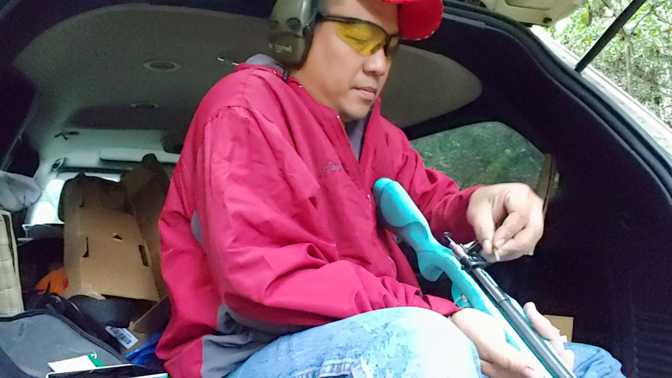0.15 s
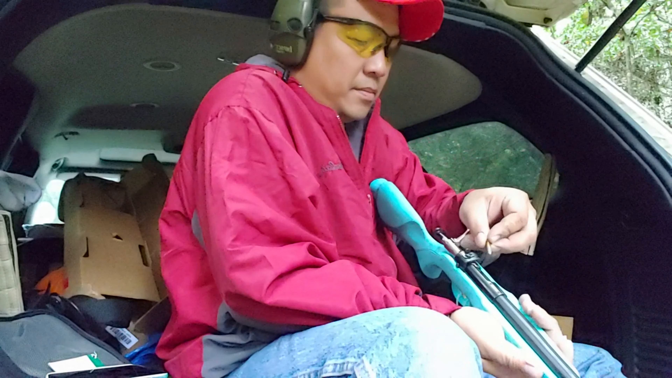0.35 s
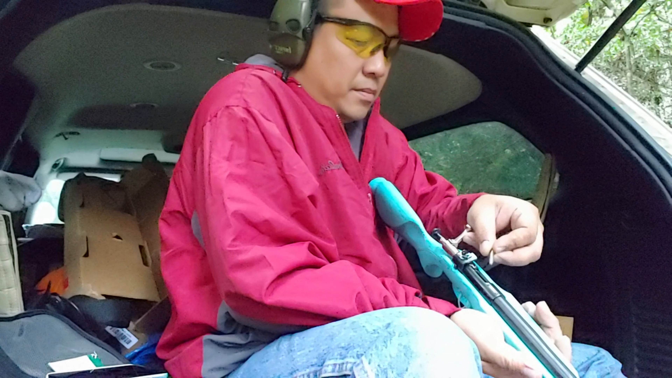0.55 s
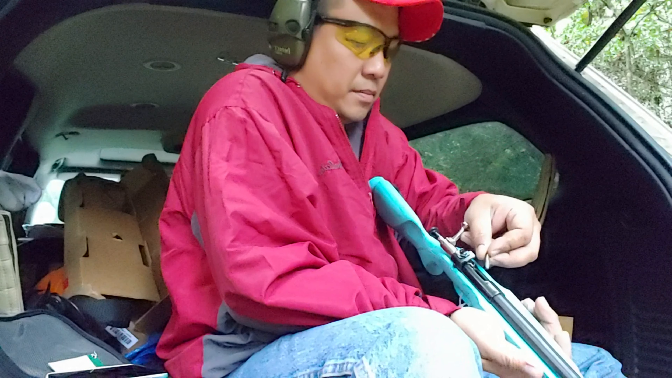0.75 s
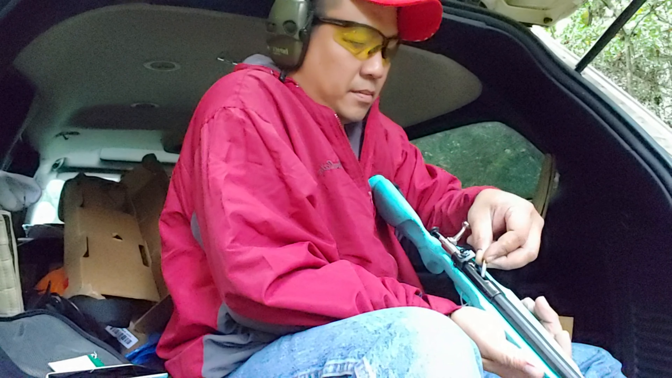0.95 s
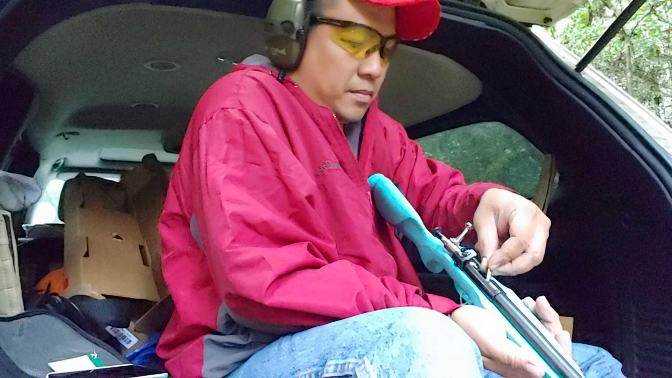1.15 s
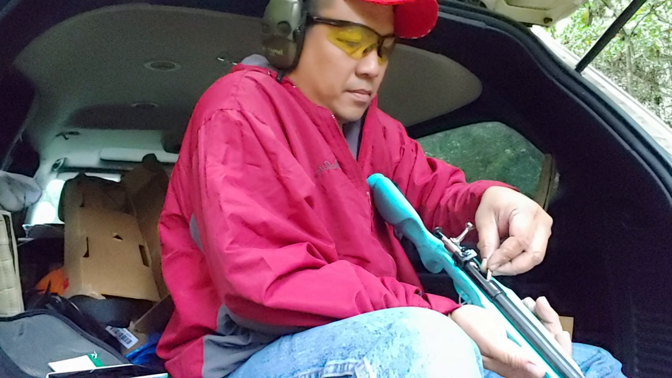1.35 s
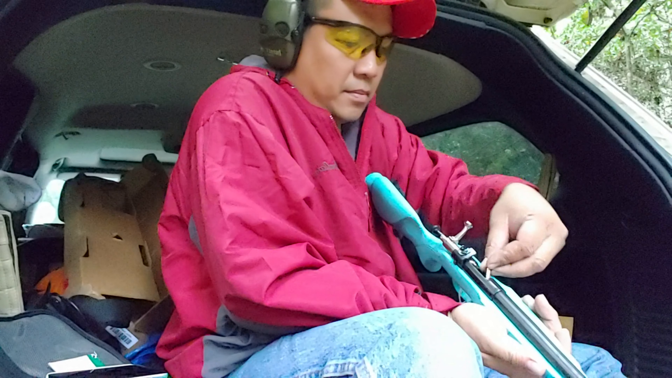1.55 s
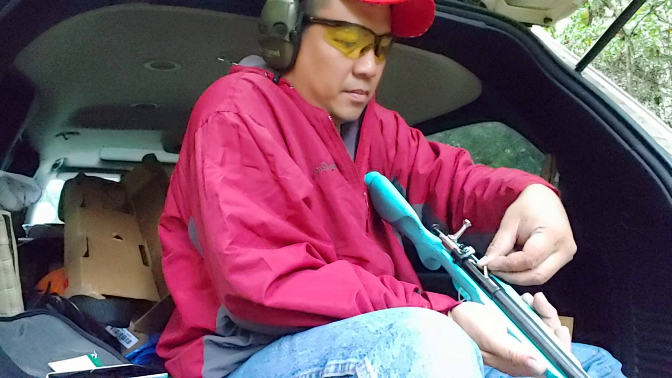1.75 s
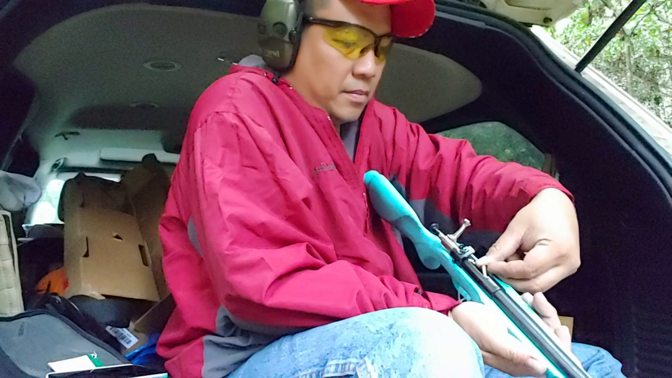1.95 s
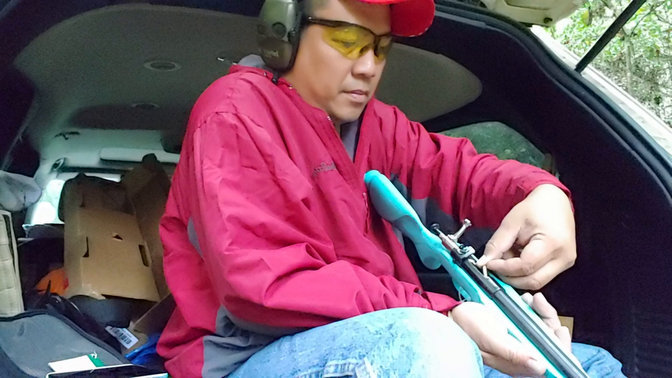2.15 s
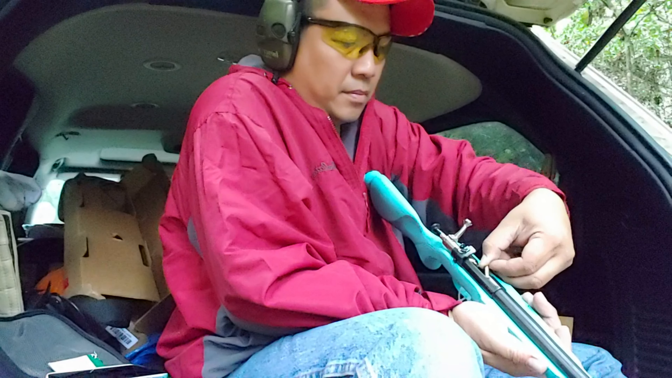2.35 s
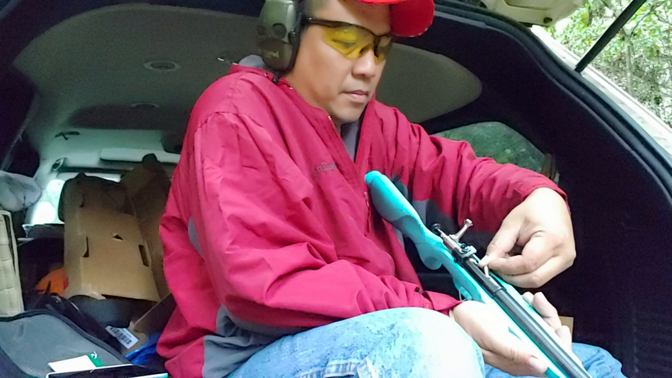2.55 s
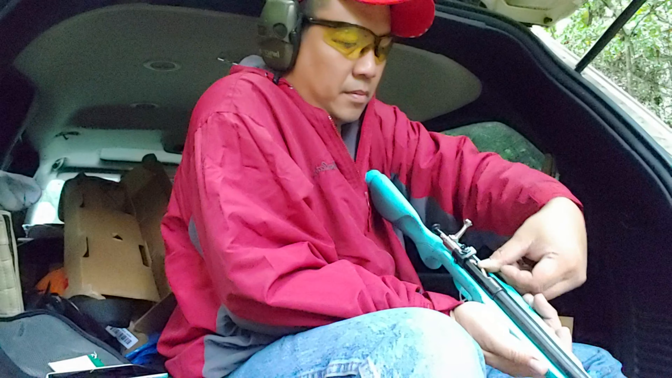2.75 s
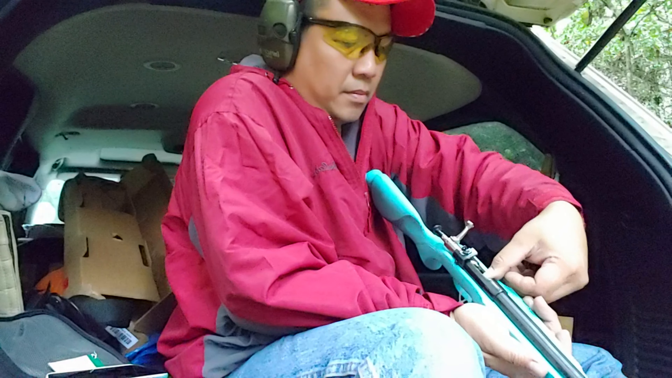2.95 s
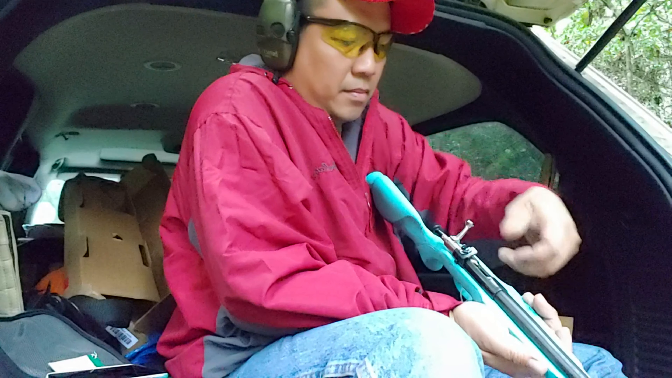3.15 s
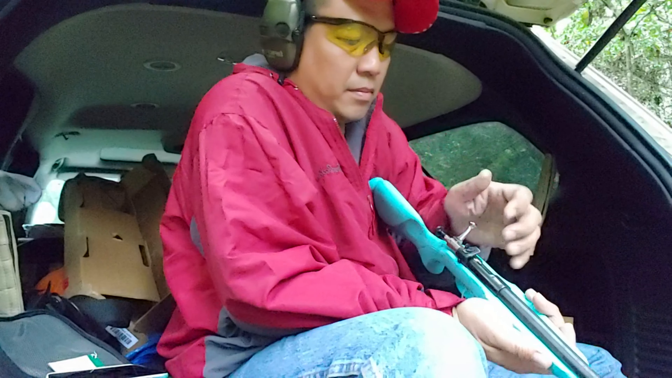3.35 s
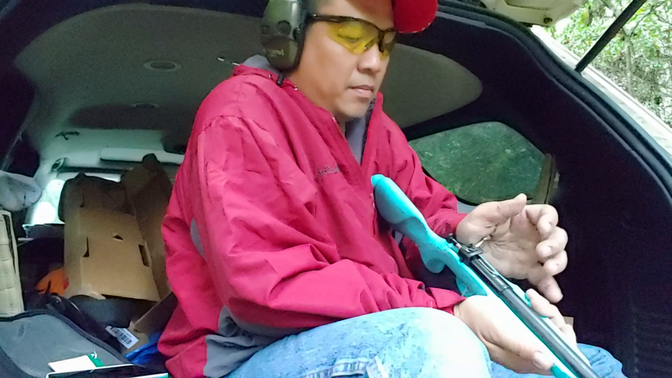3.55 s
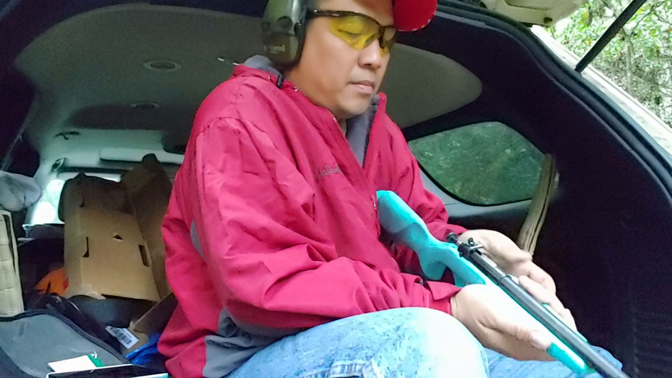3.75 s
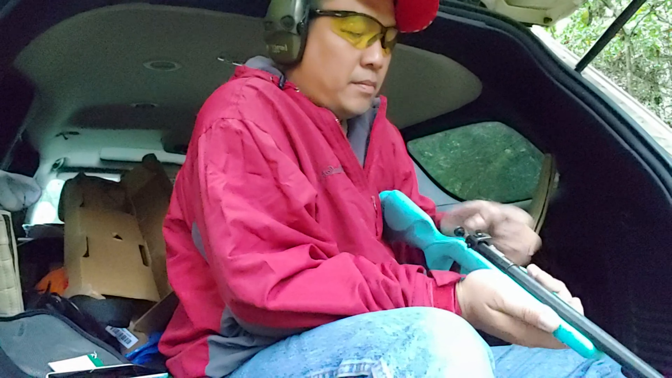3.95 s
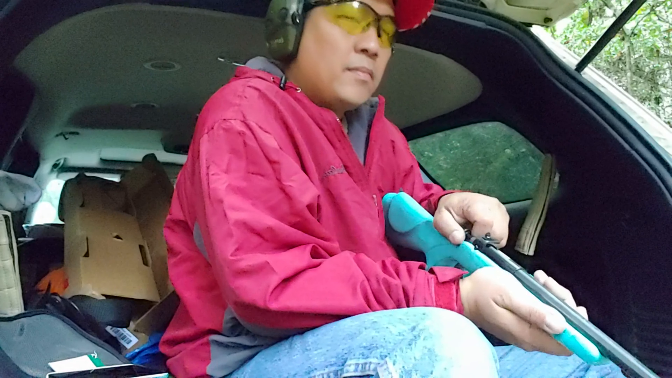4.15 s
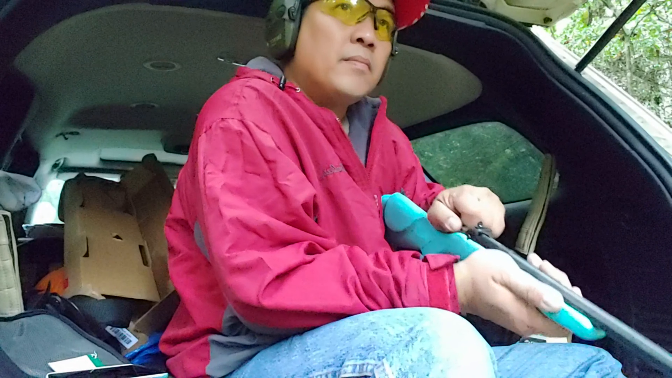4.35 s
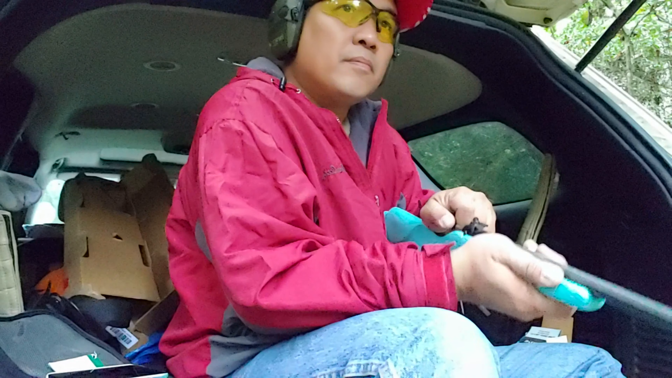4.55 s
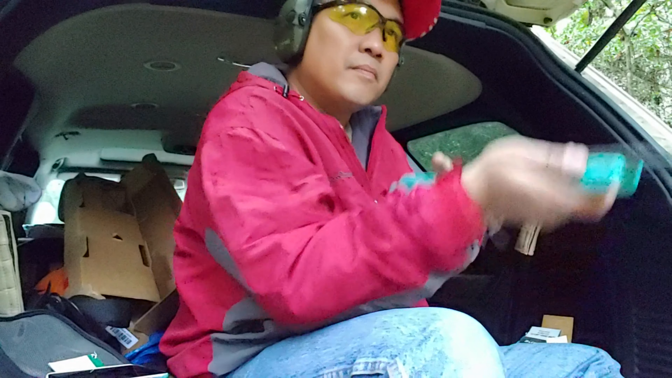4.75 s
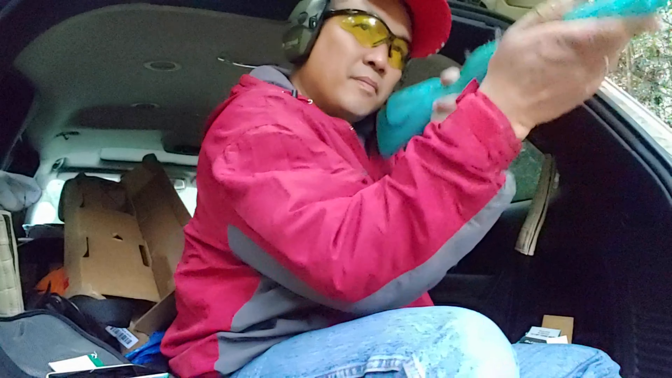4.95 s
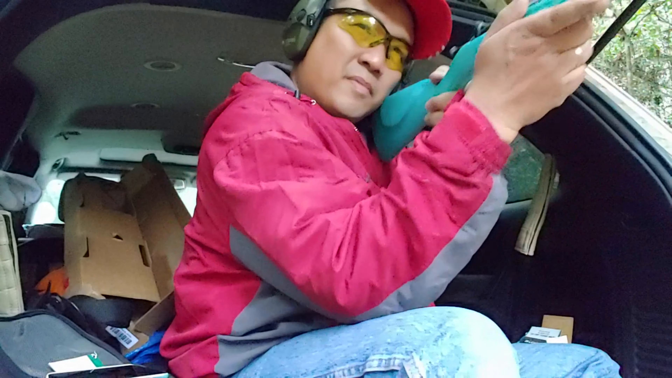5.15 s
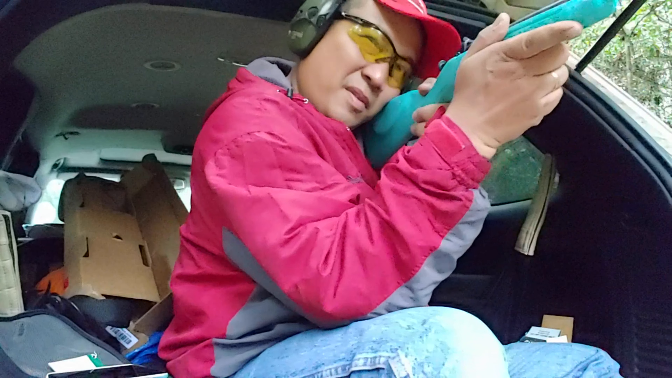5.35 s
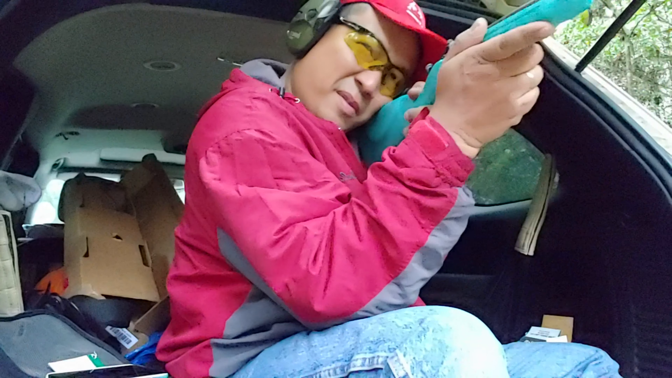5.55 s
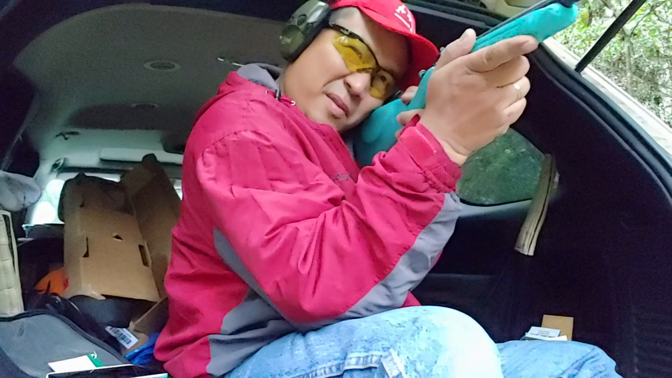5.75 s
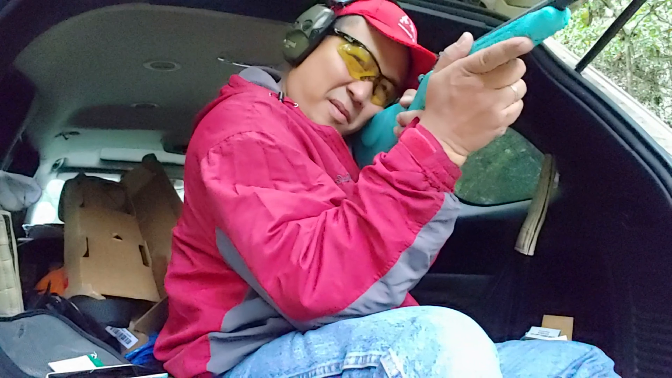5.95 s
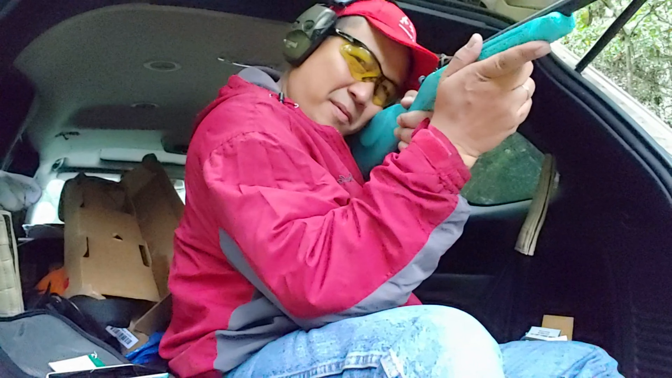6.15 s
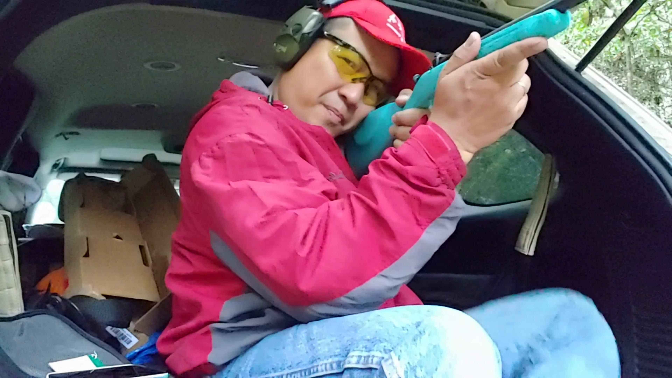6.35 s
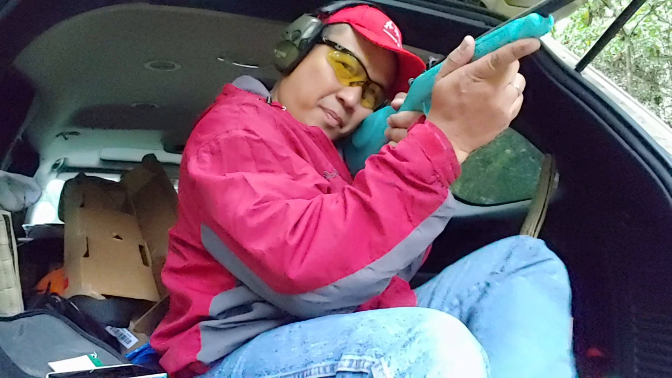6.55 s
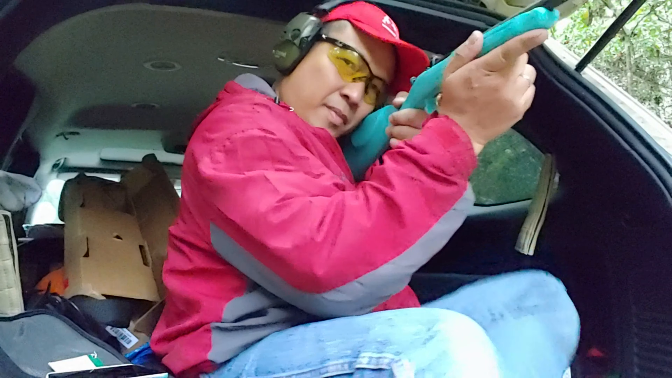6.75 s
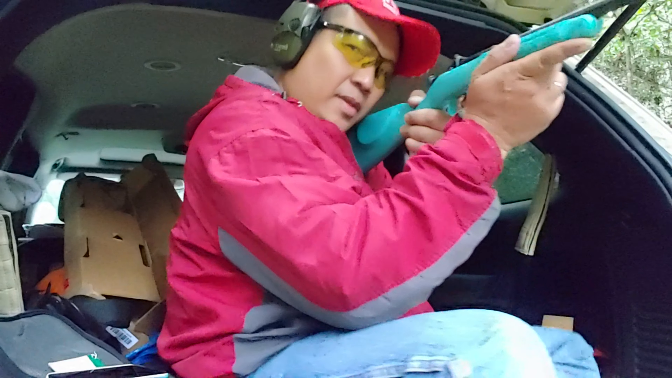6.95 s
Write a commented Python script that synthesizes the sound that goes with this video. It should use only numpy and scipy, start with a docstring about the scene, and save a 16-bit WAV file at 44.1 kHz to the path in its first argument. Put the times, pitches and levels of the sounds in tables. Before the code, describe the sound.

Metallic clicks of a rifle being loaded, a hard bolt clack, then a louder short shot with a dull thump over faint wind.

```python
"""Loading and firing a rifle in a car

A man sits in the open back of a car; a phone's two microphone ports hear him, the left one facing away from the
gun. Cartridge, bolt and grip click as chatter, part pings and steel rings; the bolt scrapes home as rough
noise. A dull thump booms in the panels and the shot's sharp crack follows, both dying fast in the padded cabin.
Noise makes the jacket's rustle, the wind outside and a faint, distant hollow drone."""
import sys
import numpy as np
from scipy import signal
from scipy.fft import rfft, irfft, next_fast_len
from scipy.io import wavfile
from scipy.ndimage import uniform_filter1d

SR = 44100
rng = np.random.default_rng(int(sys.argv[2]) if len(sys.argv) > 2 else 0)


def wav_record(signal):
    """Record a signal, one row per channel, as 16-bit PCM in the file named by sys.argv[1]."""
    frames = np.transpose(np.atleast_2d(signal))
    bounded = np.clip(frames, -1, 1)
    # unit amplitude maps onto the largest positive 16-bit level
    quanta = np.round(bounded * 32767).astype(np.int16)
    wavfile.write(sys.argv[1], SR, quanta)


N = 308501
T = np.arange(N) / SR

# Metal clicks of the cartridge, bolt and grip: start_s, strength_db, hardness_db_per_octave (treble tilt),
# stock_db, contact_decay_ms, ping_hz (part struck), ping_db (over the blow's spectrum)
RIFLE_CLICKS = [ (.4938, -34, -3.5, -7, 4.2, 4180, 14), (0.4977, -38, -6, -5, 3, 1810, 17),
                (.615, -34.5, -8, -3.5, 4.1, 4220, 13), (0.6876, -42, -15, -5.5, 3.4, 1620, 12),
                (1.1368, -50, -14, -2, 3, 3430, 12), (1.2056, -45.5, -13, 0, 4.6, 3430, 8),
                (1.434, -50, 2.5, -7, 3.4, 10900, 12), (2.177, -41.5, -4, -2, 2, 6340, 8),
                (2.371, -37.5, -12, -12, 3.9, 4400, 8), (2.68, -51, -3, 1, 3.7, 1870, 10),
                (2.8238, -48.5, -9, -7, 2, 4000, 6), (2.993, -46.5, -9, -2, 3, 4400, 10),
                (3.04, -39, -12, -3.5, 5, 1860, 12), (3.048, -36.5, -14, -7, 6, 3820, 8),
                (3.08, -56.5, -10, 8, 5.4, 1870, 15), (3.193, -49, -6, -10, 1.7, 8000, 12),
                (3.573, -36, -10, -1.5, 3.9, 1990, 11.5), (3.6134, -27.5, 2, -2.5, 3, 1750, 4),
                (3.6152, -18, 0, -14, 1.7, 5920, 17), (3.6195, -24, -4, 0.5, 3.1, 10450, 11),
                (3.6325, -22, -0.8, -4, 3.5, 4030, 9), (3.781, -37, -5, -5, 2.2, 4020, 12),
                (3.8162, -17.5, -6.3, -5, 1.6, 1760, 15), (4.186, -47.5, -12, -2.5, 3.7, 1740, 8),
                (4.498, -49.5, -10, -8, 7, 3970, 15), (4.5594, -21.5, -4, -3.5, 3.9, 1610, 6),
                (4.564, -19, -3.5, -6, 2.4, 3420, 11), (4.7321, -34, -4.5, -4.5, 4, 3800, 4),
                (5.548, -42, -2.5, -10, 3.4, 6600, 18), (5.732, -46, -1.5, -7, 2, 6530, 19),
                (5.8045, -45.5, -12, -1.5, 3.3, 2090, 9), (6.197, -46.5, -10, -5, 2.2, 2100, 13),
                (6.821, -41, -9, 4, 8.9, 3900, 0)]
# Ringing of the rifle's steel: pitch_hz, level_db, t60_s
STEEL_MODES = [(1302, -10.5, 0.079), (1641, -12.5, 0.081), (1757, -7.5, .065), (1900, -12.5, 0.087),
               (3140, -14, .10), (3760, -25, 0.028), (4220, -6.5, 0.052), (4700, -15, 0.067),
               (5300, -12, 0.086), (5870, -16.5, 0.085), (5880, -20.5, 0.11), (6400, -25, 0.14),
               (6600, -20.5, 0.28), (7070, -22, .12), (10100, -25, .08), (10480, -18, 0.17)]
# Colour that all blows on the rifle share: pitch_hz, level_db
SHARED_BLOW_TONE = [(550, -10.5), (1000, -2.5), (1700, 0), (3800, 0), (6200, 1.5), (10000, -2.5),
                    (12500, -8)]
# Strokes of the bolt in its raceway: stop_s (meets its stop), length_s, final_db
BOLT_STROKES = [(3.619, .028, -31.5), (4.56, 0.026, -38.5)]
# Soft blows on the car body: start_s, level_db, push_ms
BODY_THUMPS = [(6.316, -48, .5), (6.342, -31, 0.5), (6.8150, -19.5, 1.15), (6.821, -5.5, 1.4),
               (6.8460, -24.5, 0.56), (6.856, -9, 7.4), (6.877, -23.5, .3)]
# Resonances of the panels and cabin air: pitch_hz, level_db, t60_s
PANEL_MODES = [(89.6, -22, .08), (171, -26, .06), (262, 2.5, .04), (305.4, -2, 0.079), (492, -10, .04),
               (735, -5.5, 0.031), (1065, -8.5, 0.042)]
# Arm movements that rub the jacket: fastest_s, half_length_s, level_db
JACKET_MOVES = [(0.046, 0.18, -55.5), (3.202, 0.079, -52.5), (4.72, 0.11, -51), (5.037, 0.12, -50),
                (6.782, 0.064, -47.5)]
# Spectrum of the outdoor air: pitch_hz, relative_level_db (per Hz)
AIR_SPECTRUM = [(20, -16.5), (40, -6.5), (70, 1.5), (105, -0.5), (140, -13.5), (175, -13), (230, -19),
                (500, -15.5), (1000, -22.5), (2000, -25), (4000, -29.5), (7000, -33), (10500, -38.5),
                (12500, -43.5)]
# Breeze, a dying gust at first and a fresh one at the end: peak_s, half_length_s, rumble_rise_db, hiss_rise_db
WIND_GUSTS = [(.1, 1, -0.3, 2), (7, 0.41, 4, 5)]
# Bands of the far drone: pitch_hz, width_hz (of one filter pass), level_db
DRONE_PEAKS = [(168.3, 38, -5.5), (324, 46, -9), (505.9, 17.6, 0)]
# Colour of the left microphone port: pitch_hz, level_db
LEFT_PORT_TONE = [(150, 2.5), (400, -3), (1000, 0.5), (1800, -1.5), (2500, -4), (3200, -5), (3900, 0),
                  (4700, 1), (5300, -0.5), (6400, 7), (7100, 0), (7900, -8), (9300, 0), (11200, 0)]
# Colour of the right microphone port: pitch_hz, level_db
RIGHT_PORT_TONE = [(150, 2), (400, 1), (1000, 4.5), (1750, 3.5), (2150, 0.5), (2550, -17), (3100, -1.5),
                   (3650, 7), (4700, -0.5), (6300, -6.5), (7700, 1), (9300, -5), (11200, -6.5)]

# The stock speaks below the first pitch; hardness tilts the treble above the second
STOCK_HZ, STEEL_HZ = 1700, 3720
# Blows weaker than a full one lose bass first
THUD_HZ, THUD_PER_DB, FULL_BLOW_DB = 560, 0.5, -22.5
# The hands damp a ping by 60 dB within this many cycles, so low pings last longer
PING_CYCLES = 58.5


def shot():
    """The striker snaps forward; the crack follows at once and sets the receiver pinging."""
    striker_s, crack_delay_ms = 6.8761, 2.4
    striker = blow(-23.5, hardness=-8, stock_db=-1.5, contact_ms=3.2, ping_hz=3480, ping_db=-3)
    crack = blow(-21.5, hardness=-4, stock_db=0.5, contact_ms=2.3, ping_hz=3600, ping_db=17.5)
    out = np.zeros((2, N))
    add(out, striker_s, striker)
    add(out, striker_s + crack_delay_ms / 1000, crack)
    return out


def rifle():
    """Blows of metal on metal as he loads, locks the bolt and takes aim."""
    out = np.zeros((2, N))
    for start_s, *click in RIFLE_CLICKS:
        add(out, start_s, blow(*click))
    return out


def blow(db, hardness, stock_db, contact_ms, ping_hz, ping_db):
    """One blow on the rifle: contact chatter, a ping of the part struck, ringing steel and cabin reflections."""
    t = np.arange(SR // 5) / SR
    tone = blow_tone(db, hardness, stock_db)
    attack = 1 - np.exp(-(1000 * t / 0.81) ** 2)  # rise in ms
    crack = contact_crack(t, attack, contact_ms)
    cabin = cabin_decay(t)
    # chatter and each port's reflections have noise of their own
    bursts = np.array([crack, cabin, cabin]) * rng.standard_normal((3, len(t)))
    chatter, *echoes = colour(bursts, tone, size=512)
    ping_fade = fade(t, PING_CYCLES / ping_hz)
    ping = undb(ping_db + db_at(ping_hz, tone)) * ping_fade * np.sin(2 * np.pi * ping_hz * t)
    direct = chatter + attack * (ping + steel_ring(t, tone))
    return np.array([far_port(direct), direct]) + echoes


def blow_tone(db, hardness, stock_db):
    """Spectrum of a blow: hard contacts are bright, the stock adds body, and only strong blows thud."""
    hz, shared = np.transpose(SHARED_BLOW_TONE)
    treble = hardness * np.maximum(np.log2(hz / STEEL_HZ), 0)
    body = db_at(hz, [(STOCK_HZ, stock_db), (STEEL_HZ, 0)])
    thud_db = THUD_PER_DB * (db - FULL_BLOW_DB)
    thud = db_at(hz, [(THUD_HZ, thud_db), (2 * THUD_HZ, 0)])
    return np.column_stack([hz, db + shared + treble + body + thud])


def contact_crack(t, attack, contact_ms):
    """Envelope of steel chattering on steel in a quick run of uneven micro-contacts."""
    hold = 20  # samples per micro-contact
    strengths = np.repeat(rng.standard_normal(len(t) // hold + 1), hold)[:len(t)]
    contacts = unit(undb(4 * strengths))  # spread 4 dB
    return undb(15.5) * attack * contacts * np.exp(-1000 * t / contact_ms)


def cabin_decay(t):
    """Envelope of the padded cabin's reflections: a strong short tail over a weak longer one."""
    build = 1 - np.exp(-1000 * t / 0.55)  # in ms
    early = undb(8.5) * fade(t, 0.058)
    late = undb(-13) * fade(t, 0.35)
    return build * (early + late)


def steel_ring(t, tone):
    """Decaying modes of the steel, each as strong as the blow's spectrum at its pitch, give or take."""
    rings = modes(t, STEEL_MODES)
    mode_hz = np.array(STEEL_MODES)[:, 0]
    chance_db = 2 * rng.standard_normal(len(STEEL_MODES))
    return undb(3.7 + db_at(mode_hz, tone) + chance_db) @ rings


def far_port(direct):
    """The left port faces away from the gun: later, and shaded in the middle range and treble."""
    later = np.pad(direct, (SR // 5500, 0))[:len(direct)]  # about 0.18 ms
    shade = [(400, -2.5), (1400, -6.0), (2400, -2.5), (3700, -9.5), (6000, -7.5), (10000, -6)]
    return colour(later, shade, size=256)


def bolt_slide():
    """The bolt scrapes along its raceway as rough, rubbing noise."""
    tone = [(300, -13), (1700, -2), (3800, 2), (6200, -6), (11000, -16)]
    return friction(bolt_motion(), tone, grain_db=-3, grain_rate=290, surge_db=0.5)


def bolt_motion():
    """Gain of the scrape: it grows as the bolt gathers speed, until it meets its stop."""
    swell_db, edge_s = 8, 0.004
    gain = 0
    for stop_s, length_s, final_db in BOLT_STROKES:
        left_s = stop_s - T
        from_edge_s = np.minimum(left_s, length_s - left_s)
        moving = np.clip(from_edge_s / edge_s + 0.5, 0, 1)
        gain = gain + moving * undb(final_db - swell_db * np.clip(left_s / length_s, 0, 1))
    return gain


def car_body():
    """A soft push sets the panels booming, and the trim shudders after it as noise."""
    rattle_db, rattle_t60_s, rise_s, apart = -13, 0.13, 0.0015, 0.32
    tone = [(60, -2), (300, 5.0), (600, 17.5), (1100, 6.0), (1800, 4.0), (4000, -17)]
    out = np.zeros((2, N))
    t = np.arange(SR // 4) / SR
    boom = (1 - np.exp(-t / rise_s)) * modes(t, PANEL_MODES).sum(axis=0)
    for start_s, db, push_ms in BODY_THUMPS:
        chance = rng.standard_normal(len(t)) + apart * rng.standard_normal((2, len(t)))
        shudder = undb(rattle_db) * fade(t, rattle_t60_s) * colour(chance, tone)
        # the longer the push, the duller the thump
        push = np.hanning(int(push_ms * SR / 1000) + 3)
        add(out, start_s, undb(db) * signal.lfilter(push / push.sum(), 1, boom + shudder))
    return out


def jacket():
    """The jacket rubs as he moves his arms: cloth friction noise."""
    tone = [(200, 2.5), (900, 3.0), (1800, -4.5), (4000, 1.5), (7000, -9), (10000, -9.5), (12500, -24)]
    return friction(arm_motion(), tone, grain_db=4.5, grain_rate=220, surge_db=4.0)


def arm_motion():
    """Gain of the rustle: single movements over a slight fidgeting that calms as he settles."""
    fidget_db, settle_db_per_s = -57, 1.1
    moves = sum((undb(db) * swell(fastest_s, half_s)) ** 2 for fastest_s, half_s, db in JACKET_MOVES)
    return np.sqrt(moves + undb(fidget_db - settle_db_per_s * T) ** 2)


def friction(gain, points, grain_db, grain_rate, surge_db):
    """Rubbing surfaces catch and slip in uneven little bursts, alike in time at both ports."""
    # the caps limit the swing on one side: the loud side for the jacket, the quiet side for the bolt
    grain = grain_db * np.minimum(walk(grain_rate), 2)
    surge = surge_db * np.minimum(walk(14), 1)
    grip = undb(grain + surge)
    return gain * np.array([unit(grip * noise(points)) for _ in range(2)])


def wind():
    """Low rumble reaches both ports alike; the hiss of air and leaves reaches each on its own."""
    air_db, split_hz = -19.5, 520
    lull_rumble_db, lull_hiss_db = -1.67, 0.46
    low = signal.butter(2, split_hz, fs=SR, output="sos")
    high = signal.butter(2, split_hz, "high", fs=SR, output="sos")
    gusts = [np.outer(rises_db, swell(peak_s, half_s)) for peak_s, half_s, *rises_db in WIND_GUSTS]
    rumble_db, hiss_db = sum(gusts)
    rumble_gain = undb(lull_rumble_db + rumble_db + 0.26 * walk(3.4))
    hiss_gain = undb(lull_hiss_db + hiss_db + 0.9 * walk(5.8))
    rumble = signal.sosfilt(low, noise(AIR_SPECTRUM)) * rumble_gain
    hiss = signal.sosfilt(high, [noise(AIR_SPECTRUM), noise(AIR_SPECTRUM)]) * hiss_gain
    return undb(air_db) * (rumble + hiss)


def drone():
    """Narrow, wavering bands of noise, far off, fade to a steady remainder."""
    start_db, fade_db_per_s, rest_db, apart = -53, 4, -65, 0.76
    source = rng.standard_normal(N) + apart * rng.standard_normal((2, N))
    out = 0
    for hz, width_hz, db in DRONE_PEAKS:
        b, a = signal.iirpeak(hz, hz / width_hz, fs=SR)
        once = signal.lfilter(b, a, source)
        out = out + undb(db) * unit(signal.lfilter(b, a, once))
    return undb(np.maximum(start_db - fade_db_per_s * T, rest_db)) * out


def undb(db):
    """Decibels to gain."""
    return 10 ** (np.asarray(db) / 20)


def unit(x):
    """Scale to rms 1."""
    return x / np.sqrt(np.mean(x ** 2))


def db_at(hz, points):
    """Read a spectrum on a log-frequency axis."""
    f, db = np.transpose(points)
    return np.interp(np.log(np.maximum(hz, 1)), np.log(f), db)


def colour(x, points, size=2048):
    """Causal filter with the given spectrum, from the folded cepstrum."""
    gain = undb(db_at(np.fft.rfftfreq(size, 1 / SR), points))
    cepstrum = irfft(np.log(gain))
    cepstrum[1:size // 2] *= 2
    cepstrum[size // 2 + 1:] = 0
    response = irfft(np.exp(rfft(cepstrum)))
    length = next_fast_len(x.shape[-1] + size, real=True)
    return irfft(rfft(x, length) * rfft(response, length), length)[..., :x.shape[-1]]


def noise(points):
    """Noise with the given spectrum."""
    return colour(rng.standard_normal(N), points)


def walk(rate):
    """Smooth random wander of rms near 1, with about rate new values per second."""
    k = int(SR / rate)
    steps = np.repeat(rng.standard_normal(N // k + 1), k)
    return unit(uniform_filter1d(steps, k)[:N])


def swell(s, half_s):
    """A smooth rise and fall that peaks at 1 at time s."""
    return np.exp(-((T - s) / half_s) ** 2)


def fade(t, t60):
    """Exponential decay, 60 dB down after t60 seconds."""
    return np.exp(-np.log(1000) * t / t60)


def modes(t, table):
    """Decaying sines of a struck body, one row per mode."""
    return np.array([undb(db) * fade(t, t60) * np.sin(2 * np.pi * hz * t) for hz, db, t60 in table])


def add(out, s, sound):
    """Mix a stereo sound in at time s."""
    i = int(s * SR)
    out[:, i:i + sound.shape[1]] += sound[:, :N - i]


def scene():
    """Rifle, car, clothing and the air outside."""
    gun = shot() + rifle() + bolt_slide()
    return gun + car_body() + jacket() + wind() + drone()


def record(dry):
    """Each port colours the sound in its own way; the phone rounds the highest peaks and cuts the top."""
    ports = [colour(dry[0], LEFT_PORT_TONE), colour(dry[1], RIGHT_PORT_TONE)]
    rounded = np.tanh(ports)
    top_cut = signal.ellip(6, 0.1, 45, 12000, fs=SR, output="sos")  # low-pass at 12 kHz
    return signal.sosfiltfilt(top_cut, rounded)


dry = scene()
out = record(dry)
wav_record(out)
```